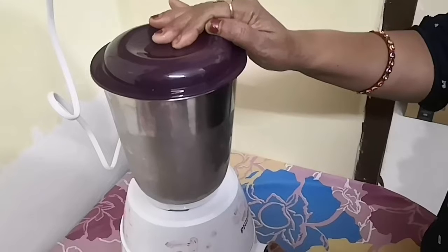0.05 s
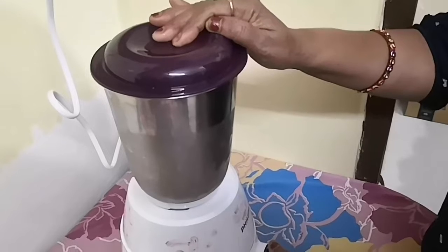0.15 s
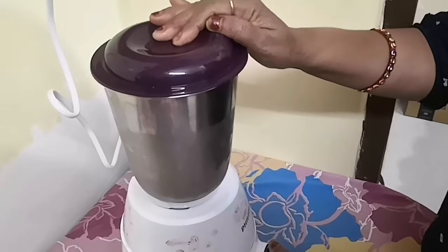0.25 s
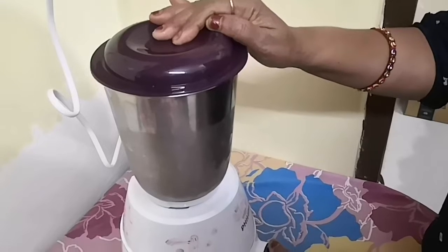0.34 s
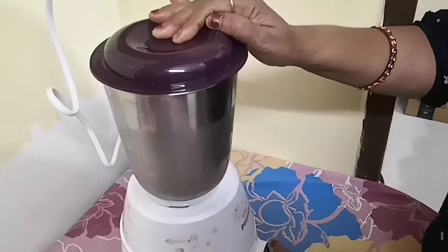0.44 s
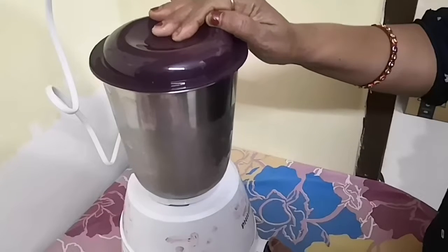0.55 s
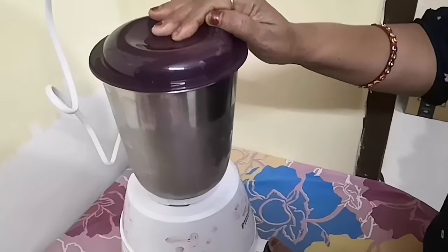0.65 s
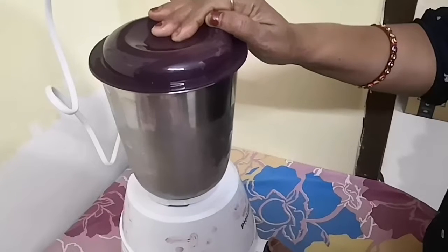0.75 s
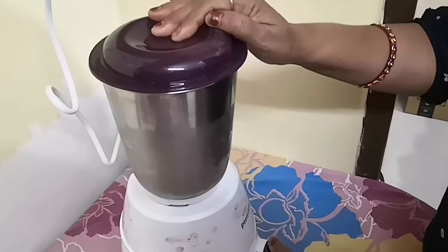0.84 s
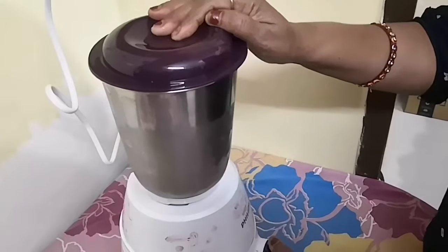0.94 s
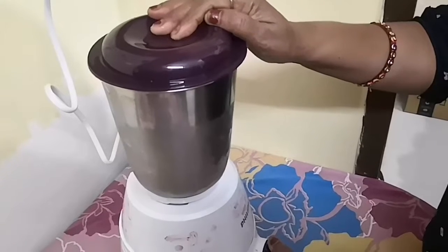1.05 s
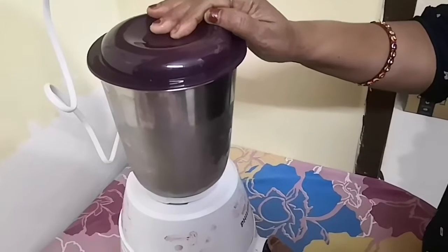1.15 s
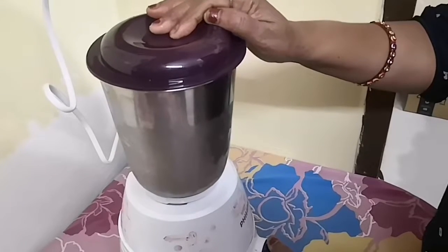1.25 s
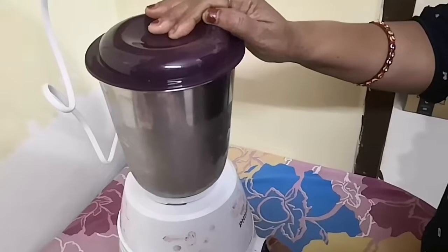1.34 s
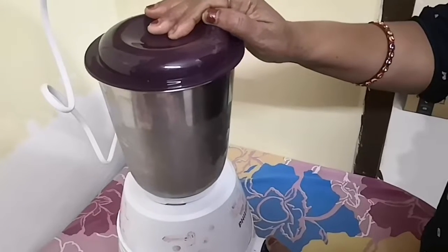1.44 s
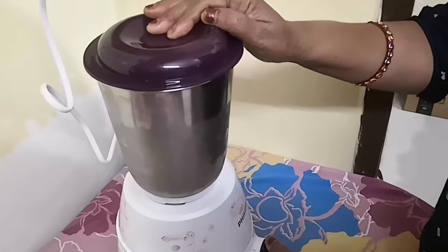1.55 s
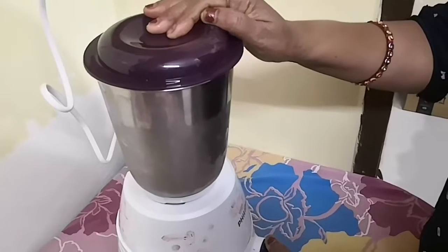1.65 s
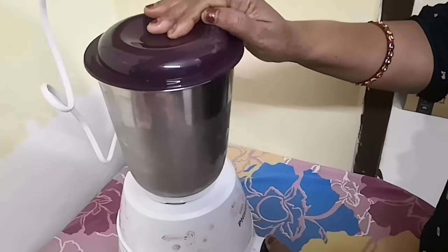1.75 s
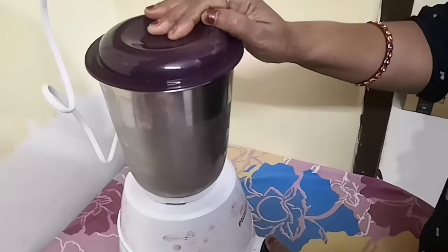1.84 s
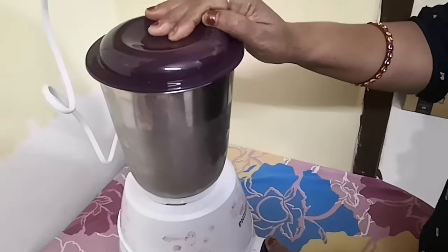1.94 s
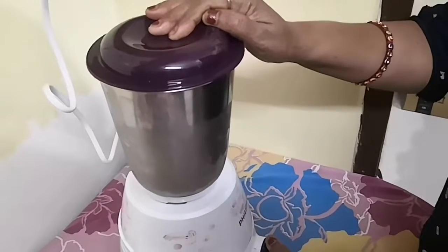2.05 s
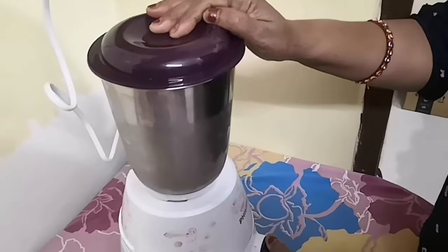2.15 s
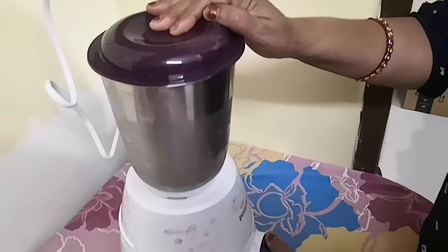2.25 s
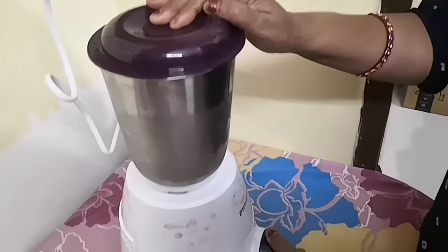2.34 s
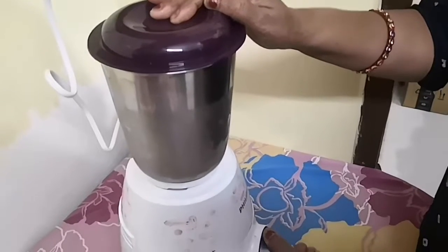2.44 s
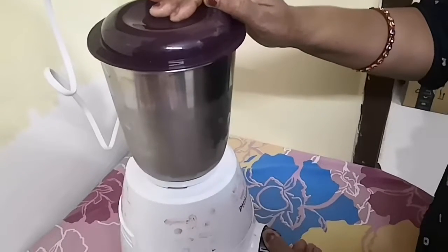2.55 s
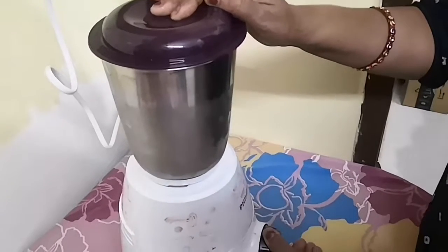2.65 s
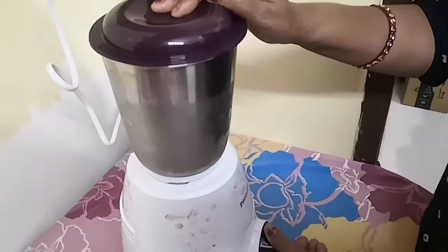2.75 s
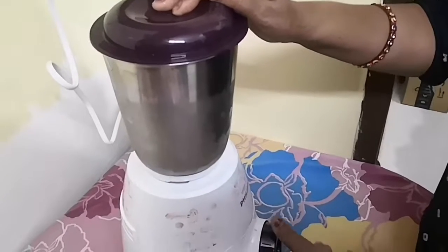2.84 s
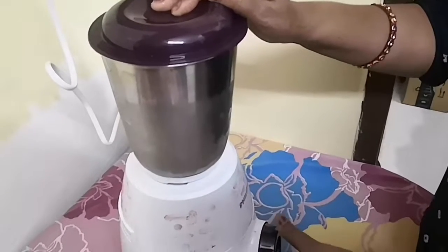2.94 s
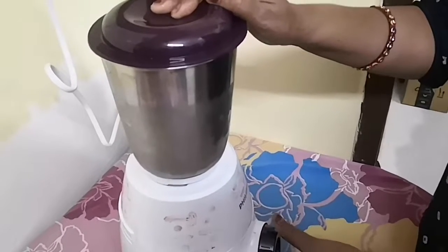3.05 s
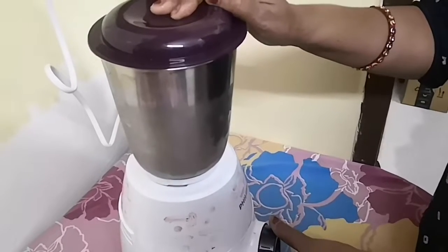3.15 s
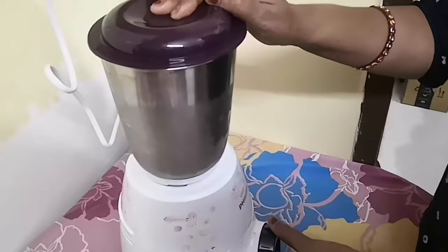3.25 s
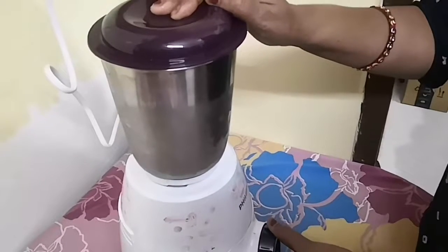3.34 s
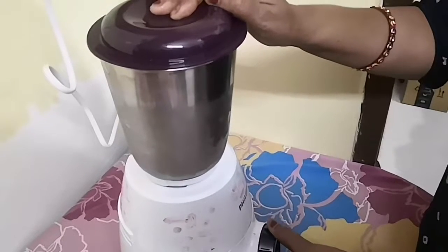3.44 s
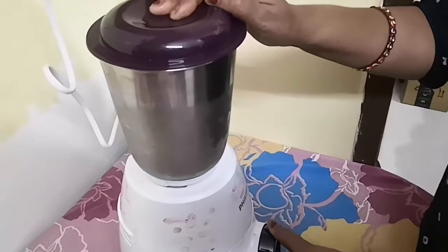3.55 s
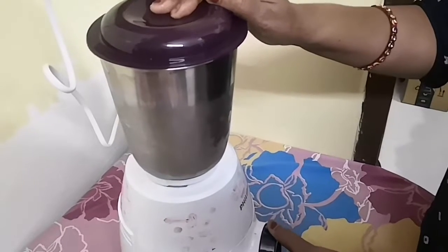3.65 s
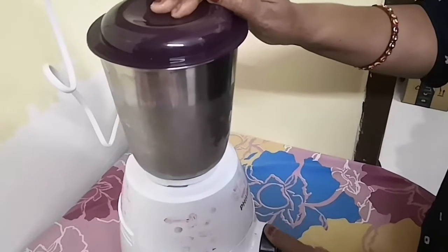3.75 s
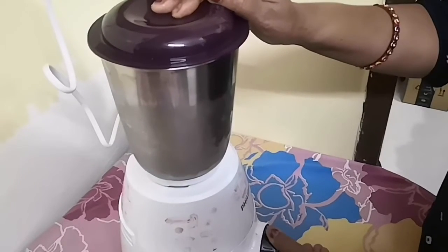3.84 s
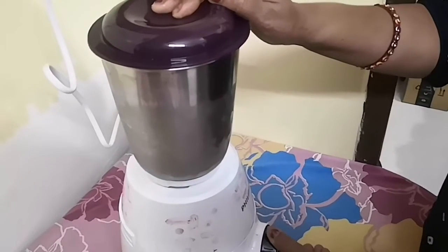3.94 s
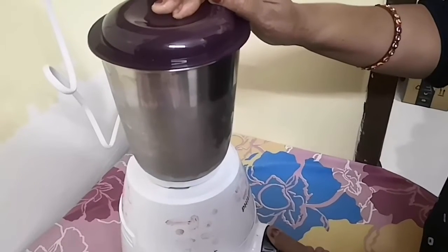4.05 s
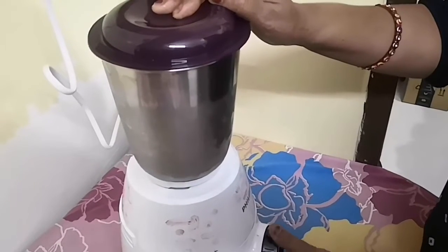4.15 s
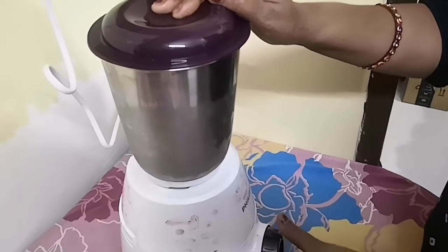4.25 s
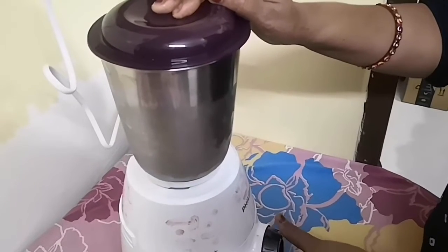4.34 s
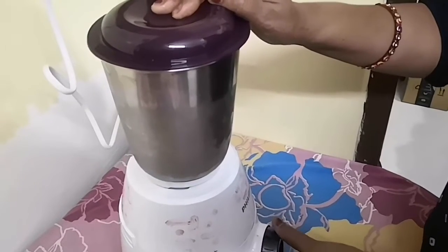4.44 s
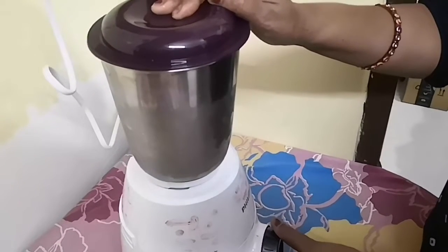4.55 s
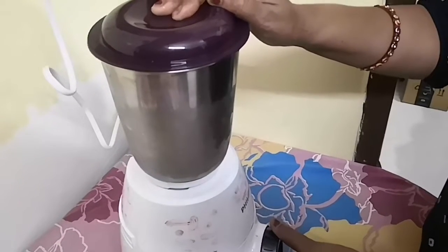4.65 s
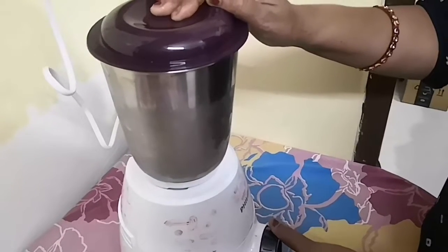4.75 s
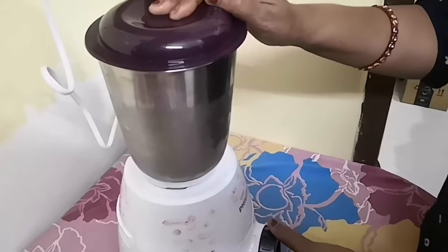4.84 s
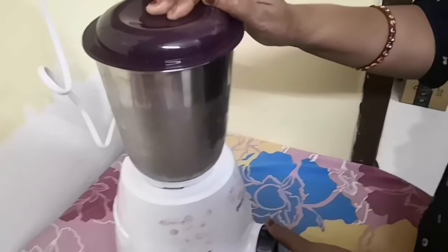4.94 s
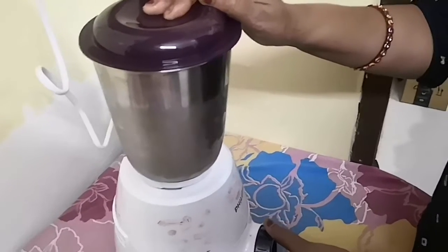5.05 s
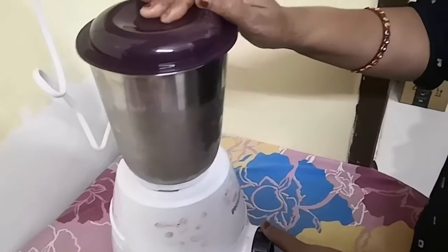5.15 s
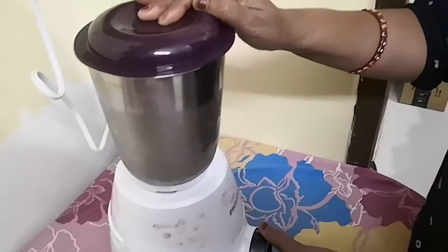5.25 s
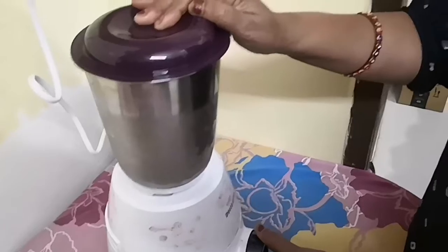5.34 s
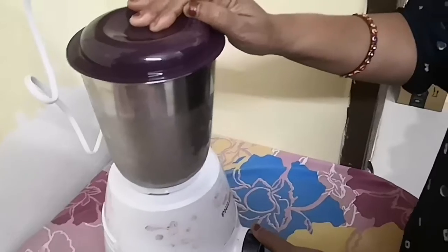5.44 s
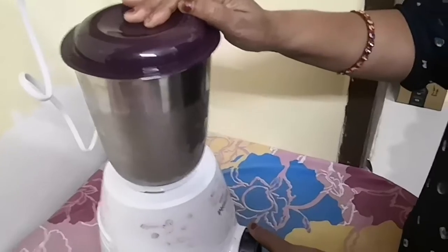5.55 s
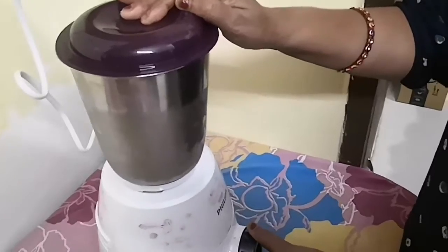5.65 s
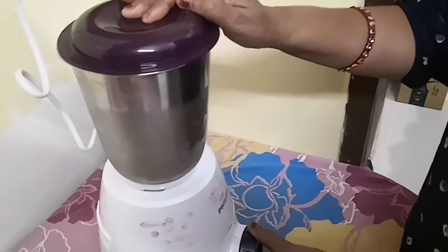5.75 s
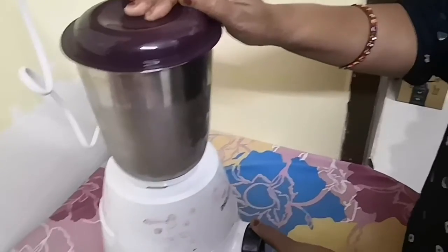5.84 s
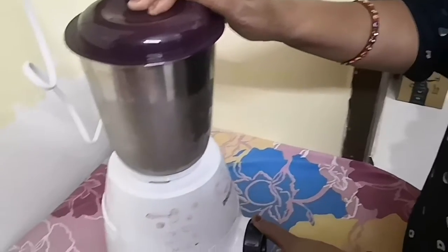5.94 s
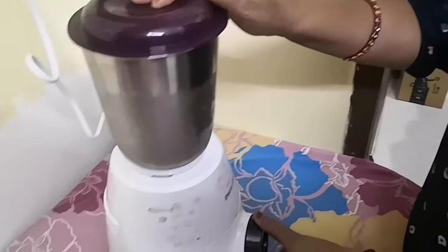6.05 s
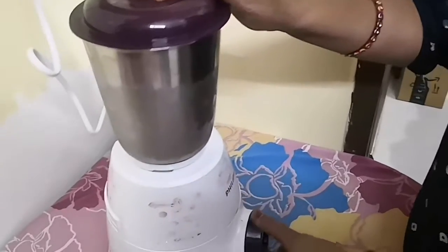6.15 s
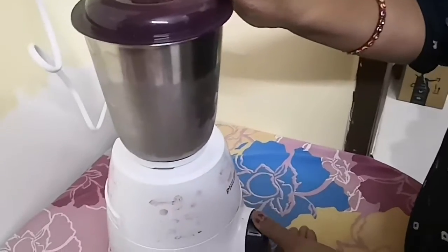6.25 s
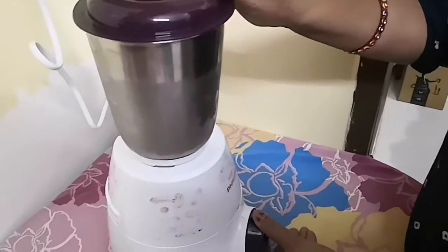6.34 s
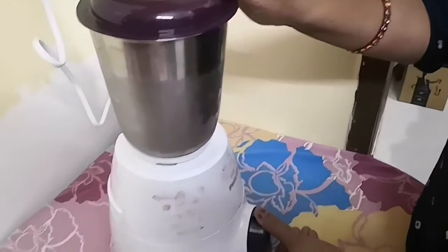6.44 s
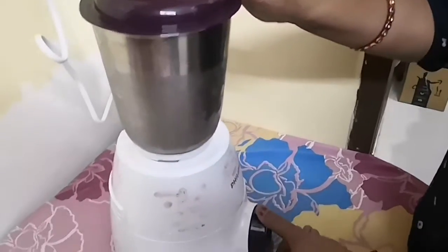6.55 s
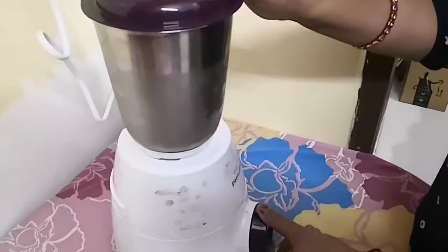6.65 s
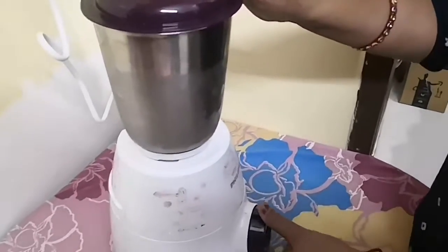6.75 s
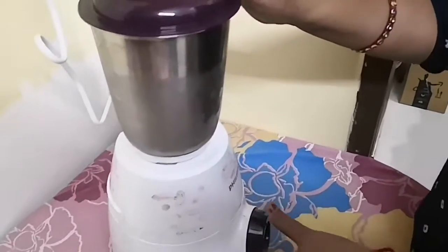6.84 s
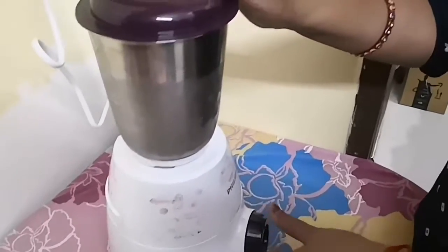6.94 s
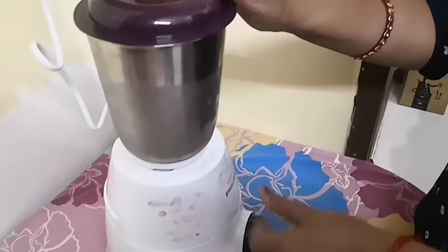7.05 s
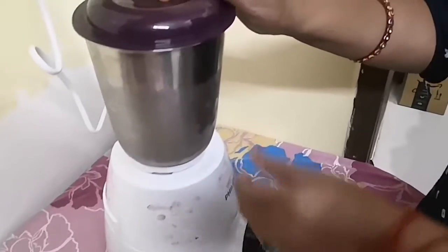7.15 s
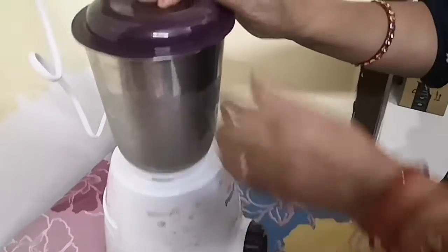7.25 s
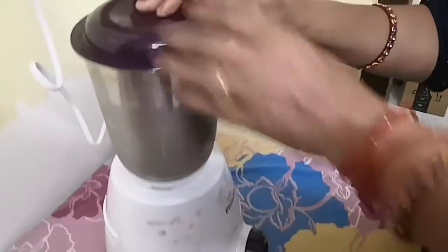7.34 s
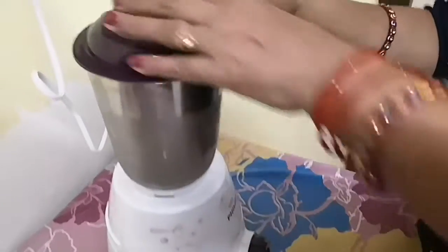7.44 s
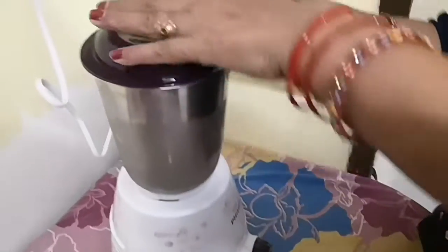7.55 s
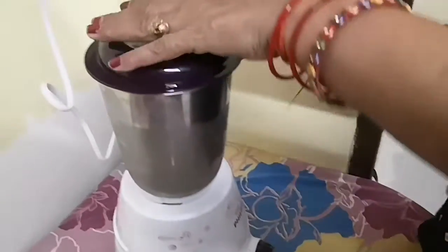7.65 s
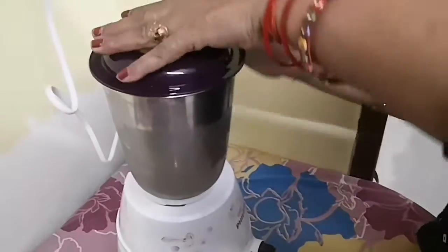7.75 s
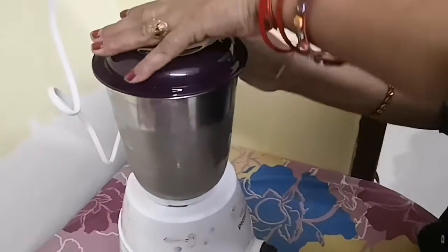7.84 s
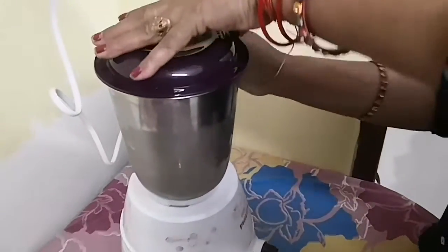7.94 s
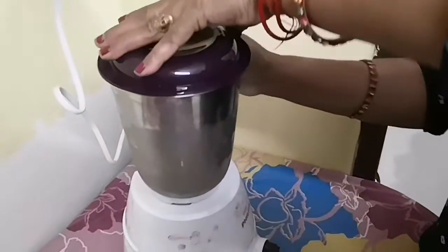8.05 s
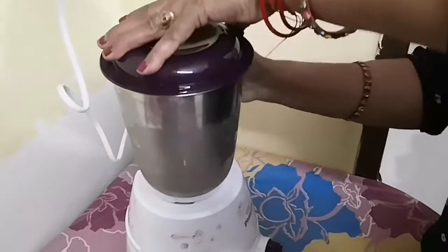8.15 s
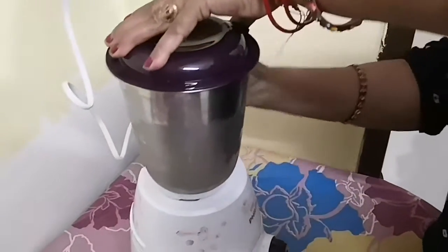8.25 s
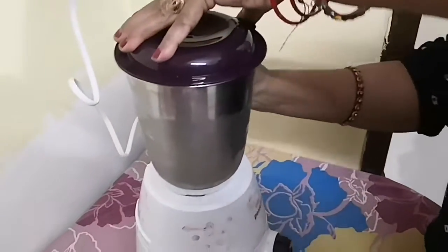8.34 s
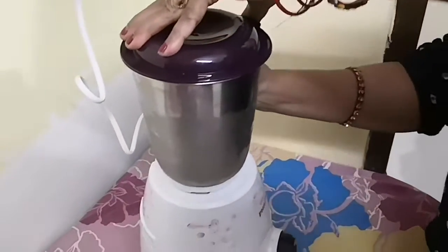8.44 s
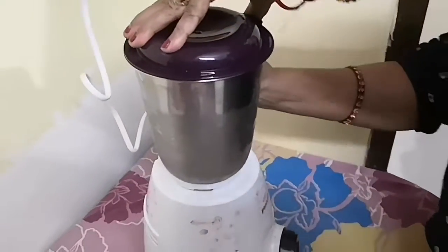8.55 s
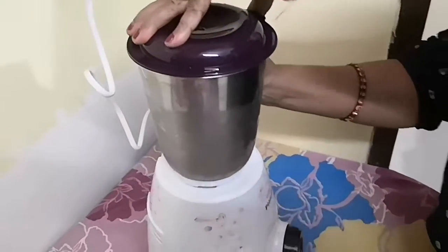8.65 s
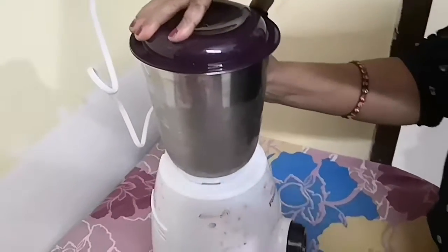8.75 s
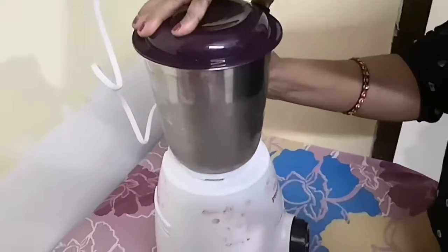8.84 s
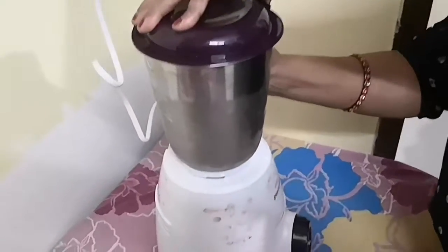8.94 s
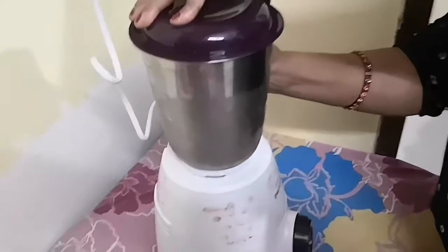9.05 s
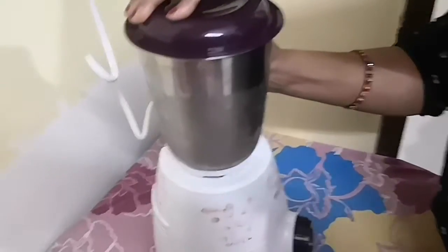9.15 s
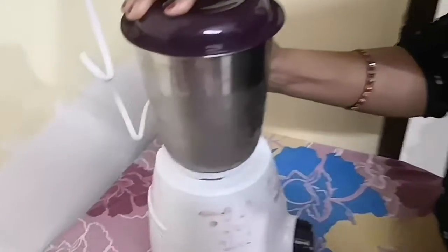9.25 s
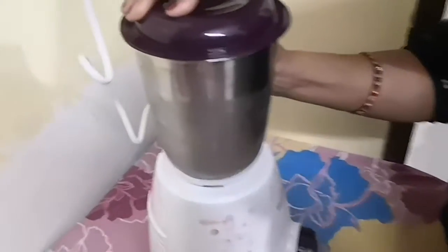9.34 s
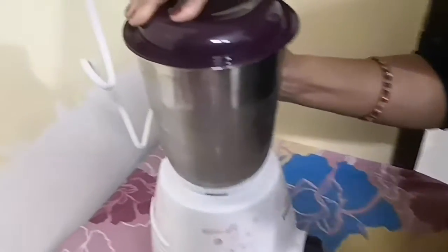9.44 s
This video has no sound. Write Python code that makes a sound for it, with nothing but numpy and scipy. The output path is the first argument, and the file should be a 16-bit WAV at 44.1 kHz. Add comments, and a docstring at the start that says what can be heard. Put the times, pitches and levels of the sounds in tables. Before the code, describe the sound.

From the start an electric mixer grinder runs at high speed, close to the microphone in a small kitchen. The motor hums and whines under a dense, gritty rattle, while mash churns, fine shards sizzle and lumps of ice knock irregularly against the steel jar. At about 2.5 seconds and again at 3.8 seconds the pitch sags briefly and settles slightly lower, with the whine stronger between those two points. At 6.2 seconds the motor is switched off and falls in pitch, with a cluster of last knocks and wet, slumping clots, stopping by 7.2 seconds. A bangle clinks as it stops. From about 8.2 to 9 seconds bangles tinkle and rustle faintly, and a hand leaning on the lid makes a soft low bump near 8.7 seconds, over quiet room tone.

```python
"""A small kitchen, one microphone close to a mixer grinder working ice and fruit in a steel jar.
From the start the motor hums, the coupler rattles, and the blades churn mash and fling ice at the wall.
At 2.5 s and again at 3.8 s the speed knob is turned down; each time the shaft sags, then picks up.
Switched off at 6.2 s, it runs down under a last few knocks and slumping clots, and stops by 7.2 s.
Then bangles tinkle faintly and a hand leans on the lid, over the room tone."""
import sys
import numpy as np
from scipy import signal
from scipy.fft import rfft, irfft
from scipy.io import wavfile
from scipy.ndimage import uniform_filter1d

SR = 44100
rng = np.random.default_rng(int(sys.argv[2]) if len(sys.argv) > 2 else 0)


def wav_out(sig):
    """Save sig, one row per channel (or a flat mono array), as 16-bit PCM at SR to the path in sys.argv[1]."""
    wavfile.write(sys.argv[1], SR, np.round(np.clip(np.atleast_2d(sig).T, -1, 1) * 32767).astype(np.int16))


N = 418509
TIME = np.arange(N) / SR
POWER_OFF_S, STANDSTILL_S = 6.225, 7.165
MAINS_HZ, TOP_HZ, BLADE_ARMS = 50, 15300, 3
TORQUE_PHASE = 2 * np.pi * 2 * MAINS_HZ * TIME  # torque pulses twice per mains cycle

# Levels in the tables are relative; each source applies its own gain.
# knob settings: (time [s], shaft speed [turns/s], shaking [dB], whine [dB], grinding [dB])
KNOB_STEPS = [(0, 232.0, -28, 0, -17), (2.5, 223.0, -27, 7.5, -18.0), (3.78, 212.5, -26, -1.5, -18)]
# tones of the shaft: (multiple of shaft speed [-], level [dB])
SHAFT_TONES = [(1, 3), (2, -3), (3, 1), (4, -11)]
# magnetic whine of the rotor: (multiple of shaft speed [-], level [dB])
WHINE_TONES = [(4, -18.5), (6, -10.5), (9, -30), (10, -17), (12, -2)]
# resonances and a notch of the motor base: (frequency [Hz], width [Hz], gain [dB])
BASE_RESONANCES = [(135, 14, 8), (346, 44, 14), (428, 36, -12), (1328, 70, 8)]
# colour of the lidded jar: (frequency [Hz], level [dB])
JAR_COLOUR = [(60, -27.5), (300, -9), (550, -11.5), (800, -5), (1100, -4.5), (2100, -1), (3000, 0),
              (3700, -10), (6100, -12.5), (8000, -24), (9900, -32), (12500, -34.5), (15000, -40.5)]
# resonances of the steel jar: (frequency [Hz], width [Hz], gain [dB])
JAR_RESONANCES = [(345, 24, -4.5), (771, 28.4, 13.5), (849, 53, 7.5), (1335, 115, 8.5), (1575, 40, 9),
                  (1898, 146, 7), (2130, 140, 5), (2570, 149, 9.5), (2684, 93, 3.5), (3110, 33, 4.5),
                  (4307, 280, 7), (5736, 310, 3.5), (9120, 240, 7.5), (10820, 400, 3.5), (12400, 350, 2)]
# big lumps of ice against the wall: (time [s], level [dB], treble level [dB])
ICE_KNOCKS = [(0.407, -12, -22), (0.4764, -17, -23), (1.047, -30, -20.5), (1.536, -25, -19.5),
              (1.5577, -8, -31), (2.565, -25, -20), (3.0036, -11, -20), (3.087, -13, -25),
              (3.268, -15, -23.5), (3.2827, -13.5, -21), (3.8861, -15, -28), (3.9537, -15.5, -24),
              (4.1337, -20, -26), (4.2463, -14, -25), (4.6856, -10.5, -21), (4.8997, -25, -20.5),
              (5.225, -10.5, -24), (5.7414, -12, -25), (6.0908, -13, -26), (6.4299, -11, -22.5),
              (6.6422, -13, -29), (6.706, -12, -23.5), (6.7243, -16, -29), (6.767, -17, -29),
              (6.807, -23, -33), (6.863, -14, -26), (6.885, -12, -25.5), (6.9134, -19.5, -33),
              (7.061, -35, -59), (7.122, -41, -60)]
# rumble of the swirling mash: (frequency [Hz], level [dB])
MASH_COLOUR = [(25, -23.5), (55, -29.5), (82, -6), (105, -5), (120, -24), (140, 0.5), (170, -3.5),
               (265, -3.5), (295, -7.5), (345, 4.5), (440, -3), (510, -13), (700, -8.5), (1200, -12),
               (4000, -62)]
# showers of fine shards: (time [s], level [dB])
SHARD_SHOWERS = [(0.2653, -27), (1.497, -23), (3.0041, -26), (4.2472, -26), (4.5416, -32), (5.2889, -23),
                 (5.7942, -28)]
# their sizzle on the steel: (frequency [Hz], level [dB])
SIZZLE_COLOUR = [(1500, -12.5), (4000, -14), (5800, 10), (8000, -16), (9900, -6.5), (12300, 2),
                 (14000, -11), (15000, -23.5)]
# pitches about which the wall squeaks: (frequency [Hz], level [dB])
SQUEAK_PITCHES = [(5780, 3.5), (12300, -2.5)]
# heavy clots slumping to the bottom of the jar: (time [s], level [dB])
CLOT_SLUMPS = [(6.864, -22), (6.886, -23.5), (7.122, -36)]
# slop of the fallen mash: (frequency [Hz], level [dB])
SLOP_COLOUR = [(100, -24), (230, -6.5), (370, 0.5), (480, -9.5), (640, -2), (820, 0.5), (1100, -7),
               (1600, -9.5), (4000, -47)]
# the machine on its rubber feet, two soft resonances: (frequency [Hz], level [dB])
FEET_COLOUR = [(50, -20), (82, 6), (112, -9), (146, 8), (200, 1), (500, -52)]
# bangles touching the knob and each other: (time [s], level [dB], pitch [Hz])
BANGLE_TINKS = [(7.148, -27.5, 4980), (7.297, -52, 4500), (8.241, -37, 2700), (8.331, -57, 8000),
                (8.373, -50, 4000), (8.418, -47, 4460), (8.511, -50, 6500), (8.655, -40, 2900),
                (8.916, -53, 3900), (9.011, -59, 6500)]
# partials of a bangle: (multiple of its pitch [-], level [dB])
BANGLE_PARTIALS = [(1, 1.5), (1.45, -16)]
# bangles sliding along the arm: (frequency [Hz], level [dB])
RUSTLE_COLOUR = [(600, -10), (2400, 4), (3600, -10), (5600, -12), (7500, -16), (10000, -27), (15000, -36)]
# room tone of the kitchen: (frequency [Hz], level [dB])
ROOM_COLOUR = [(15, -38), (25, -17), (59, -7.5), (75, -18.5), (98, -6.5), (163, -1), (202, -10.5),
               (231, -10), (264, -11.5), (326, -12), (529, -17.5), (1630, -13), (2700, -24), (4500, -41),
               (15000, -57.5)]


def motor(angle, speed, powered, shake, whine_db, ripple=.17, critical_hz=173, hum_db=-29):
    """Shaft harmonics and rotor whine; the pulsing torque hums and gives each harmonic two side tones."""
    coasting_db = -14 + 17 * buried(speed)  # the blade's tone swells once it is in the mash
    blade_db = -6 * powered + (1 - powered) * coasting_db
    whirl_db = 9.5 * np.exp(-((speed - critical_hz) / 18) ** 2)  # the shaft whirls at its critical speed
    tones = 0
    for order, db in SHAFT_TONES:
        flutter_db = (-.4 if order == 1 else 2.5) * drift(3.6)
        gain = from_db(db + blade_db * (order == BLADE_ARMS) + whirl_db * (order == 2) + flutter_db)
        for side in (-1, 0, 1):
            depth = ripple * np.sqrt(order) * powered if side else 1
            lift = from_db(lift_db(BASE_RESONANCES, order * speed + side * 2 * MAINS_HZ))
            tones += gain * depth * lift * np.sin(order * angle + side * TORQUE_PHASE)
    whine = powered * from_db(whine_db)
    for order, db in WHINE_TONES:
        tones += whine * from_db(db + lift_db(BASE_RESONANCES, order * speed)) * np.sin(order * angle)
    # the small housing cannot radiate the slowest shaking
    tones = signal.sosfilt(signal.butter(6, 88, "high", fs=SR, output="sos"), tones)
    return shake * tones + from_db(hum_db) * powered * np.sin(TORQUE_PHASE)


def knob(switch_s=.06, sag_hz=7.5, pick_up_s=.33, whine_db_per_hz=.8):
    """Speed and levels set by the knob; between two contacts the speed and whine sag, then pick up."""
    steps = np.array(KNOB_STEPS)
    setting = np.searchsorted(steps[1:, 0], TIME)
    turned_s, speed, shake_db, whine_db, grind_db = steps[setting].T
    sag = sag_hz * (setting > 0) * np.exp((turned_s - TIME) / pick_up_s)
    controls = speed - sag, shake_db, whine_db - whine_db_per_hz * sag, grind_db
    return [uniform_filter1d(control, size=round(switch_s * SR)) for control in controls]


def run_down(drag_s=.88):
    """Share of the running speed that is left: drag slows the shaft at first, dry friction stops it."""
    coasted_s = np.clip(TIME, POWER_OFF_S, STANDSTILL_S) - POWER_OFF_S
    left = np.exp(-coasted_s / drag_s)
    return (left - left.min()) / (1 - left.min())


def grinding(angle, speed, powered, rattle_db=-7.5, grit_db=-5.5, air_db=-3, surge_db=.31):
    """The coupler rattles twice a turn, ice grit ticks on the blades and air rushes round the jar."""
    slap = (.5 + .5 * np.cos(2 * angle)) ** 2 * (1 + .099 * np.cos(angle))
    torque = 1 + .13 * powered * np.cos(TORQUE_PHASE)
    rattle = rms_one(slap * rng.standard_normal(N)) * torque
    grit = grains(per_s=7 * speed)
    air = rng.standard_normal(N)
    force = from_db(rattle_db) * rattle + from_db(grit_db) * grit + from_db(air_db) * air
    return force * from_db(surge_db * drift(14))


def ice_knocks(pace, small_per_s=4, rise_s=.00088, crush_s=.0046, split_hz=3700, low_cut_hz=1700):
    """Each hard lump hits the wall and crumbles within a few milliseconds."""
    lumps = list(ICE_KNOCKS)
    # small lumps strike at random, more weakly as the shaft slows
    for when, size in rng.random((round(small_per_s * STANDSTILL_S), 2)):
        s = when * STANDSTILL_S
        db = 4.5 * (2 * size - 1) + 20 * np.log10(pace[int(s * SR)] + 1e-9)
        lumps.append((s, db - 18.5, db - 26))
    force, t = np.zeros(N), TIME[:SR // 20]
    low, high = (signal.butter(3, split_hz, kind, fs=SR) for kind in ("low", "high"))
    crush = np.exp(-t / crush_s) * (1 - np.exp(-t / rise_s))
    for s, db, treble_db in lumps:
        burst = crush * rng.standard_normal(len(t))
        knock = from_db(db + 7.5) * signal.lfilter(*low, burst)
        crunch = from_db(treble_db + 17) * signal.lfilter(*high, burst)
        add(force, s, knock + crunch)
    return signal.lfilter(*signal.butter(1, low_cut_hz, "high", fs=SR), force)


def mash(pace, level_db=-25.5, slosh_db=1.8):
    """The swirling mash rumbles and sloshes, fading as the blades slow."""
    churn = pace ** .69 * from_db(level_db + slosh_db * drift(11.5))
    return body(churn * rng.standard_normal(N), MASH_COLOUR)


def shards(flow, stray_db=-34.5, spurt_db=4, shower_db=-11, shower_s=.0054):
    """Fine ice sprays the wall in spurts, now and then in a whole shower."""
    spray = flow * from_db(stray_db + spurt_db * np.minimum(drift(31), 2))
    age = TIME[:SR // 8] / shower_s
    for s, db in SHARD_SHOWERS:
        add(spray, s - shower_s / 2, from_db(db + shower_db) * age * np.exp(1 - age))
    return body(spray * rng.standard_normal(N), SIZZLE_COLOUR)


def squeaks(flow, per_s=45, until_s=6.87, length_s=.004, level_db=-31.5, scatter=.04, uneven_db=3):
    """Single shards skate on the steel in brief squeaks, even when the blades only coast."""
    out = np.zeros(N)
    swell = np.hanning(round(length_s * SR))
    for when, which, size, detune in rng.random((round(per_s * until_s), 4)):
        hz, db = SQUEAK_PITCHES[int(which * len(SQUEAK_PITCHES))]
        tone = np.sin(2 * np.pi * hz * (1 + scatter * (2 * detune - 1)) * TIME[:len(swell)])
        add(out, when * until_s, from_db(db + uneven_db * (2 * size - 1)) * swell * tone)
    return from_db(level_db) * flow ** .35 * out


def slop(speed, pace, level_db=-22.5, slump_s=.019):
    """The slowing blade wades through the fallen mash, and the last clots drop."""
    push = from_db(level_db) * buried(speed) * pace
    for s, db in CLOT_SLUMPS:
        add(push, s, from_db(db) * np.exp(-TIME[:SR // 4] / slump_s))
    return body(push * rng.standard_normal(N), SLOP_COLOUR)


def buried(speed, below_hz=111):
    """How far the mash has fallen back on the slowing blade, from 0 to 1."""
    return 1 / (1 + (speed / below_hz) ** 20)


def rocking(pace, powered, level_db=-34):
    """The coasting machine rocks on its rubber feet."""
    sway = (1 - powered) * pace ** .17 * from_db(level_db)
    return body(sway * rng.standard_normal(N), FEET_COLOUR)


def bangles(level_db=-10, crack_s=.003, ring_s=.004, ring_db=-8):
    """Each touch is a dry crack with a very short ring: the arm damps the bangles at once."""
    out, t = np.zeros(N), TIME[:SR // 10]
    for s, db, pitch in BANGLE_TINKS:
        band = signal.butter(2, [pitch / 2, min(pitch * 1.5, TOP_HZ)], "band", fs=SR)
        crack = rms_one(signal.lfilter(*band, rng.standard_normal(len(t)))) * np.exp(-t / crack_s)
        partials = sum(from_db(partial_db) * np.sin(2 * np.pi * ratio * pitch * t)
                       for ratio, partial_db in BANGLE_PARTIALS)
        ring = from_db(ring_db) * partials * np.exp(-t / ring_s)
        add(out, s, from_db(db + level_db) * (crack + ring))
    return out


def hand(slide_at_s=8.4, lean_at_s=8.68):
    """Bangles rustle down the arm, and a push on the lid rocks the machine on its feet."""
    slide = from_db(-60) * np.exp(-((TIME - slide_at_s) / .21) ** 2)
    lean = from_db(-47) * np.exp(-((TIME - lean_at_s) / .07) ** 2)
    rustle = body(slide * grains(per_s=1500), RUSTLE_COLOUR)
    return rustle + body(lean * rng.standard_normal(N), FEET_COLOUR)


def kitchen_walls(direct, wet_db=-12, t60_s=.22):
    """Close walls send a short, dense tail to the microphone just behind the direct sound."""
    t = TIME[:SR // 2]
    tail = rng.standard_normal(len(t)) * from_db(-60 * t / t60_s) * (t > .003)
    return direct + from_db(wet_db) * signal.oaconvolve(direct, tail / np.linalg.norm(tail))[:N]


def room_tone(level_db=-48):
    """The kitchen at rest: a low, gently wavering noise behind everything."""
    return from_db(level_db + .5 * drift(5)) * body(rng.standard_normal(N), ROOM_COLOUR)


def body(x, colour, resonances=(), size=8192):
    """Pass x through a causal body of unit power gain with this colour and these resonances."""
    hz = np.maximum(np.fft.rfftfreq(size, 1 / SR), 1)
    points_hz, levels_db = np.transpose(colour)
    colour_db = np.interp(np.log(hz), np.log(points_hz), levels_db)
    gain = rms_one(from_db(colour_db + lift_db(resonances, hz)))
    # minimum phase, so nothing rings before it is struck
    cepstrum = irfft(np.log(gain))
    cepstrum[1:size // 2] *= 2
    cepstrum[size // 2 + 1:] = 0
    return signal.oaconvolve(x, irfft(np.exp(rfft(cepstrum))))[:N]


def lift_db(resonances, hz):
    """How much a set of resonances raises or lowers each frequency."""
    return sum(db / (1 + (2 * (hz - centre) / width) ** 2) for centre, width, db in resonances)


def grains(per_s, spread_db=3):
    """Random clicks of uneven size; rms 1."""
    sizes = from_db(spread_db * np.minimum(rng.exponential(1, N), 4))
    return rms_one(sizes * rng.choice([-1, 1], N) * (rng.random(N) < per_s / SR))


def drift(rate_hz, hop=20):
    """Slow random wander; rms about 1."""
    pole = np.exp(-2 * np.pi * rate_hz * hop / SR)
    noise = rng.standard_normal(N // hop + 2002)
    slow = signal.lfilter([1], [1, -2 * pole, pole * pole], noise)[2000:]
    return np.interp(np.arange(N) / hop, np.arange(len(slow)), rms_one(slow))


def add(track, s, sound):
    """Mix a short sound into a track at time s."""
    at = round(s * SR)
    track[at:at + len(sound)] += sound


def from_db(db):
    return 10 ** (np.asarray(db) / 20)


def rms_one(x):
    return x / np.sqrt(np.mean(x ** 2) + 1e-20)


def scene():
    """What reaches the microphone: the shaft drives base and jar, with hand and room tone behind."""
    running_speed, shake_db, whine_db, grind_db = knob()
    pace = run_down()
    speed = running_speed * pace * (1 + .0022 * drift(10))  # lumps of ice make the speed waver
    angle = 2 * np.pi * np.cumsum(speed) / SR
    powered = np.clip(1 - (TIME - POWER_OFF_S) / .067, 0, 1)
    shake = from_db(shake_db - 3 * (1 - powered)) * pace ** .88  # the base shakes less without torque
    flow = from_db(grind_db - 1) * pace ** 1.2
    machine = motor(angle, speed, powered, shake, whine_db) + mash(pace) + rocking(pace, powered)
    jar = body(flow * grinding(angle, speed, powered) + ice_knocks(pace), JAR_COLOUR, JAR_RESONANCES)
    room = room_tone()
    fallen_mash = slop(speed, pace)
    clatter = kitchen_walls(jar + shards(flow) + squeaks(flow) + bangles())
    return machine + fallen_mash + clatter + hand() + room


def record(dry, ceiling=.9):
    """One close microphone, mono; the highest peaks are rounded and the top is cut."""
    rounded = dry / (1 + (dry / ceiling) ** 6) ** (1 / 6)
    top_cut = signal.ellip(12, .1, 80, TOP_HZ, fs=SR, output="sos")
    return np.atleast_2d(signal.sosfilt(top_cut, rounded))


dry = scene()
out = record(dry)
wav_out(out)
```